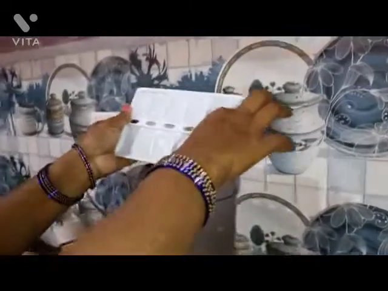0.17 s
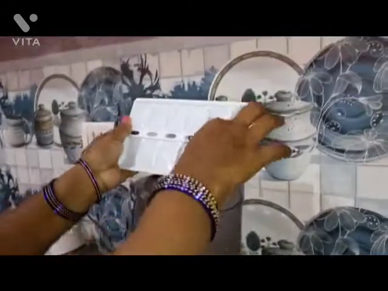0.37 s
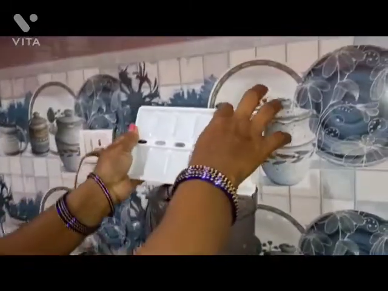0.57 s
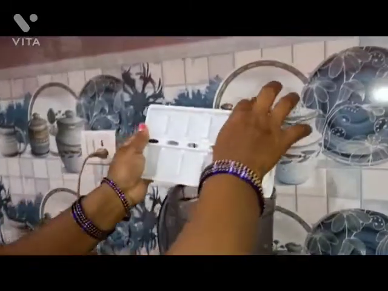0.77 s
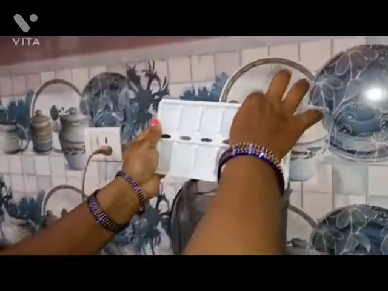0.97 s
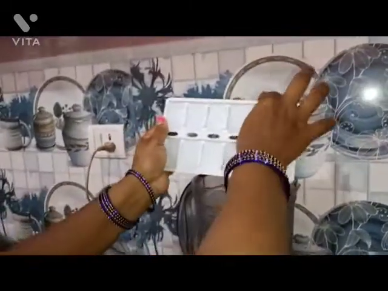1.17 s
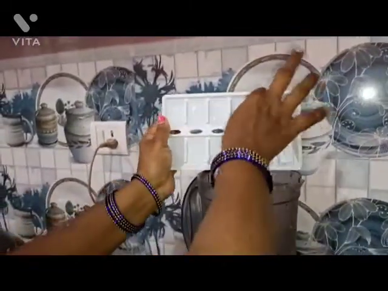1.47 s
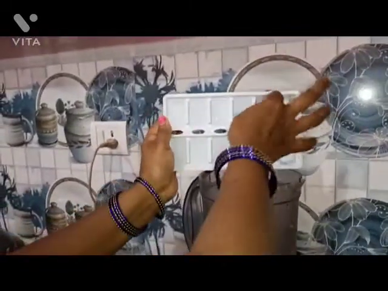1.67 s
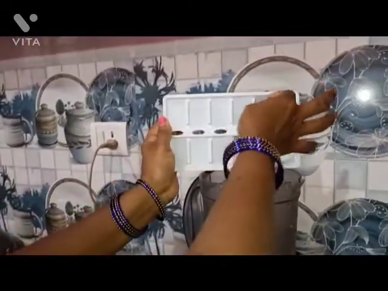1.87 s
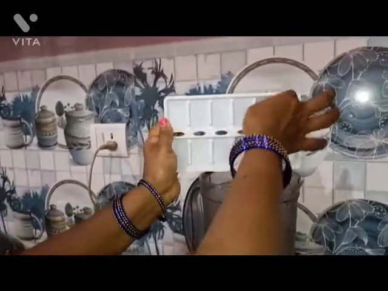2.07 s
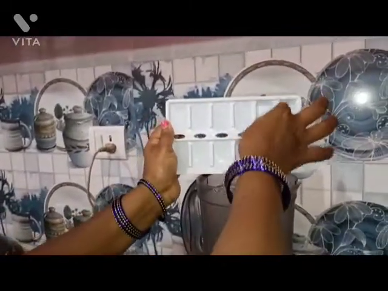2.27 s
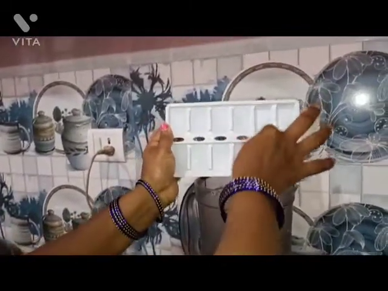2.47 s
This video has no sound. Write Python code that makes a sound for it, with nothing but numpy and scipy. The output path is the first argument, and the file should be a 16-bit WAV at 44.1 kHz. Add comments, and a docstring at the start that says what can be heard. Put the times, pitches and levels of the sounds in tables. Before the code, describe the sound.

Ice cubes crack from a plastic tray at 0.2 s with a bright double snap, then clatter densely into an empty plastic jar from 0.29 to 0.39, with stray knocks at 0.47 and 0.54. A tiny tick comes at 0.83, faint finger rubs from 0.98 to 1.8. More cubes clack at 2.07, 2.2 and 2.3, ringing glassier on ice. Close, lively tiled kitchen, quiet air and faint hum.

```python
"""In a tiled kitchen, a plastic ice tray is twisted over a plastic blender jar.
The ice cracks loose, cubes clatter into the jar, fingers shift on the tray, and a few more cubes drop.
Contacts are filtered noise bursts and rubs are grainy noise; cracks and knocks excite decaying jar modes.
The room answers with sparse echoes and a noise tail, over soft low swells, steady air noise and a faint hum."""
import sys
import numpy as np
from scipy import signal
from scipy.fft import rfft, irfft
from scipy.io import wavfile
from scipy.ndimage import uniform_filter1d

SR = 44100
rng = np.random.default_rng(int(sys.argv[2]) if len(sys.argv) > 2 else 0)


def persist_wave(psi):
    """Save psi, clipped to +-1, as 16-bit WAV."""
    counts = np.round(np.clip(psi, -1, 1) * 32767).astype(np.int16)
    wavfile.write(sys.argv[1], SR, np.atleast_2d(counts).T)


N = 114660

# Steady room noise, spectral shape before scaling: (frequency [Hz], relative level [dB])
AIR_SPECTRUM = [(25, 0.5), (49, -15), (123, -7.5), (153, -13), (249, -6.5), (394, -10), (503, -7.5),
                (560, -12.5), (988, -14.5), (2610, -19), (3920, -20.5), (7510, -39), (10700, -32),
                (16000, -44)]
AIR_DB = -52.5  # rms level
# Correlation of the room noise between left and right: (frequency [Hz], correlation [0-1])
AIR_CORRELATION = [(30, 0.68), (250, 1), (700, 0.53), (2000, 0.028), (12000, 0.81)]
# Household hum, narrow bands of noise: (frequency [Hz], rms level [dB], width at half amplitude [Hz])
HUM_BANDS = [(81.7, -65, 10), (254.5, -64, 5.3)]

# Decay of the room tail: (frequency [Hz], t60 [s])
TAIL_DECAY = [(200, 1.2), (1000, 0.57), (3500, 0.8036), (6000, 0.5827), (15000, 0.65)]
# Spectral shape of the room tail: (frequency [Hz], relative level [dB])
TAIL_SPECTRUM = [(200, -3), (1000, -8), (2000, 2.5), (3500, -1.5), (6000, 3), (10000, -4.5), (15000, -11)]
TAIL_DB, EARLY_DB = -3, -3.5
EARLY_T60_S, FIRST_ECHO_S = 0.14, 0.0025
ECHOES_PER_S = 2500

# Soft low pushes of jar and tray: (time [s], frequency [Hz], envelope peak [dB], time to peak [s])
LOW_PUSHES = [(0.351, 67, -44, 0.006), (2.27, 32.6, -54, 0.034), (0.27, 255, -44.5, 0.029)]

# Fingers and ice rubbing on the flexing tray:
# (time [s], fade to 1/e [s], level before the fade [dB], band centre [Hz])
TRAY_RUBS = [(0.0, 0.53, -61, 9000), (0.17, 0.03, -49.5, 6700), (0.979, 0.0049, -48.5, 5600),
             (1.307, 0.1, -61.5, 3300), (1.46, 0.016, -55.5, 3900), (1.641, 0.056, -51, 5600),
             (1.654, 0.14, -58.5, 2050)]
RUB_GRAIN_DB, RUB_RISE_S = 1.5, 0.0033

# Modes of jar and tray:
# (frequency [Hz], gain with jar empty [dB], gain with ice in it [dB], t60 [s]), all raised by JAR_DB
JAR_MODES = [(261, -12, 16.5, 0.34), (486.4, 7.5, -5, 0.089), (1118, 1, -5, 0.059), (1199, -10, 5, 0.24),
             (1930, -8, -1.5, 0.24), (2600, -9, -12, 0.25), (2900, -5, -16, 0.19), (3072, -10.5, 6, 0.27),
             (3065, -6, 7.5, 0.36), (3700, -16.5, -12, 0.15)]
JAR_DB, LOADED_S = 1, 1.5  # from LOADED_S on, the gains with ice apply

# Ice cracking loose in the tray:
# (time [s], level before CRACK_DB [dB], crumble decay to 1/e [s], treble shelf [dB])
ICE_CRACKS = [(0.202, -1, 0.0077, 0), (0.211, -6.5, 0.0028, -2), (0.2158, -20, 0.018, 28.5)]
# Spectral shape of the cracks: (frequency [Hz], relative level [dB])
CRACK_SPECTRUM = [(100, -26), (300, -4.5), (480, -8.5), (720, -16.5), (1100, -6), (2000, 3), (4000, 3),
                  (6300, 4.5), (7600, 1.5), (9500, 5.5), (15000, -7)]
CRACK_DB = 6.5

# Contacts of cubes knocking on tray and jar:
# (time [s], level before KNOCK_DB [dB], chatter decay to 1/e [s], clack pitch [Hz], second pitch [Hz],
#  clack boost [dB], hollow low part [dB], bright tick [dB], drive to jar and room [dB])
CUBE_KNOCKS = [(0.2921, -7, 0.003, 2920, 1650, 17, -18, 12, 5),
               (0.2938, 3, 0.002, 3150, 1830, 5, 0, -7, -2.5),
               (0.3058, -10.5, 0.0016, 3500, 2900, 6, -2, 8, -5),
               (0.3137, 2, 0.004, 3440, 5750, 10.5, -25, 6.5, -2),
               (0.3221, -8, 0.005, 3200, 4300, 11, 0, 16.5, 5.5),
               (0.3344, -5, 0.0024, 5300, 4000, 11.5, -26, 7, 8.5),
               (0.3395, -9.5, 0.003, 3810, 4640, 13, -9, 9.5, 9.5),
               (0.3505, -4.5, 0.0026, 6000, 3260, 3, -9.5, 11.5, 6),
               (0.3607, -2, 0.0041, 3110, 3670, 8, -0.5, 9, 3),
               (0.378, -11.5, 0.0016, 3140, 1970, 10, 1, 12, 3),
               (0.3831, 5, 0.0037, 3900, 5350, 5.5, -10, 3, -11.5),
               (0.3883, -9, 0.0032, 3700, 2800, 8, 2.5, 8.5, 5.5),
               (0.4707, -9.5, 0.005, 3130, 1997, 13.5, 4, 6.5, 0.5),
               (0.544, -12.5, 0.0037, 1234, 4700, 9.5, 6.5, 0, 1.5),
               (0.8274, -21, 0.0022, 3900, 1830, 12.5, -10, 11, -4),
               (0.8279, -23.5, 0.0011, 3440, 3780, 11, -4, -4, -9.5),
               (2.0176, -26, 0.0077, 3700, 2600, 4.5, -29, 1, 9.5),
               (2.0664, -8, 0.0006, 3390, 1740, 11, 1, -15, -4.5),
               (2.071, -4, 0.00078, 3500, 4100, 6.5, -4.5, -6, -5.5),
               (2.082, -12.5, .01, 3460, 1810, -11, -8, 5, 4.5),
               (2.1944, -4, 0.0024, 2840, 1240, 9.5, 1.5, 9, 0),
               (2.2262, -9, 0.0022, 1890, 5270, 7, -1, 2.5, 9.5),
               (2.228, -4.5, 0.0024, 3050, 2300, 14.5, 0.5, -1, -3.5),
               (2.3025, -7.5, 0.002, 3120, 1400, 24, -8, 4, -20),
               (2.3041, -4, 0.0019, 2325, 1860, 6.5, -3.5, -6.5, 5)]
# Spectral shape of the knocks: (frequency [Hz], relative level [dB])
KNOCK_SPECTRUM = [(100, -20), (300, -24.5), (500, -14.5), (750, -20.5), (1100, 0), (1500, -3.5), (2100, 1),
                  (3800, 2), (4600, -8), (6000, -6.5), (7400, -14), (8600, -9), (11500, -6.5),
                  (15000, -23.5)]
KNOCK_DB = 8.5
HOLLOW_HZ, TICK_HZ = 1760, 7450  # corners of the low and high parts
CLACK_OCT, SECOND_OCT = 0.077, 0.13  # half-widths of the two pitches [octaves]
TOUCH_S, CONTACT_RISE_S = 0.00061, 0.00088
RIGHT_OWN = 0.92  # weight of the right side's own chatter

# Response at the left microphone: (frequency [Hz], gain [dB])
LEFT_RESPONSE = [(300, -0.5), (1100, 4), (2400, 4.5), (4200, 7), (6200, 5.5), (8000, -3), (11000, -3.5),
                 (15000, 3)]
# Response at the right microphone: (frequency [Hz], gain [dB])
RIGHT_RESPONSE = [(300, 4.5), (1100, 6.5), (2400, -3), (4200, -4), (6200, -1), (8000, 3), (11000, -3.5),
                  (15000, -9.5)]
CEILING, EDGE_HZ = 0.85, 15700  # soft limit of the mix (amplitude) and upper band edge


def amp(db):
    """Logarithmic level: decibels become an amplitude gain."""
    return 10 ** (np.asarray(db) / 20)


def evened(x):
    """Mean power: a signal is scaled to rms 1."""
    return x / np.sqrt(np.mean(x ** 2) + 1e-20)


def read(points, hz):
    """Logarithmic pitch scale: a table is interpolated along log frequency."""
    f, value = np.transpose(points)
    return np.interp(np.log(hz + 1), np.log(f + 1), value)


def add(mix, s, sound):
    """Superposition: a sound is summed into the mix from time s."""
    part = mix[..., round(s * SR):][..., :sound.shape[-1]]
    part += sound[..., :part.shape[-1]]


def bins(size=2048):
    """Discrete spectrum: the frequencies on which filters are drawn, offset by 1 Hz to avoid zero."""
    return np.fft.rfftfreq(size, 1 / SR) + 1


def colour(x, db):
    """Minimum phase: folding the cepstrum makes a causal filter with the given gain on bins()."""
    cepstrum = irfft(db * np.log(10) / 20)
    half = len(cepstrum) // 2
    cepstrum[1:half] *= 2
    cepstrum[half + 1:] = 0
    response = irfft(np.exp(rfft(cepstrum)))
    return signal.oaconvolve(x, response[None], axes=1)[:, :x.shape[1]]


def background():
    """Stationary noise: partly correlated air noise, and narrow bands whose beating makes the hum waver."""
    hz = np.fft.rfftfreq(N, 1 / SR)
    shared, own, hum_noise = rfft(rng.standard_normal((3, N)))
    same = read(AIR_CORRELATION, hz)
    right = same * shared + np.sqrt(1 - same ** 2) * own
    air = evened(irfft(np.array([shared, right]) * amp(read(AIR_SPECTRUM, hz)), N))
    hum = np.zeros(N)
    for f, db, width in HUM_BANDS:
        resonance = 1 / (1 + (2 * (hz - f) / width) ** 2)
        hum += amp(db) * evened(irfft(hum_noise * resonance, N))
    return amp(AIR_DB) * air + hum


def kitchen(x):
    """Reverberation: sparse echoes from jar, counter and tiles join a tail decaying at its own rate per band."""
    t = np.arange(SR) / SR
    onset = np.clip(t / FIRST_ECHO_S - 1, 0, 1)
    sparse = rng.standard_normal((2, SR)) * (rng.random((2, SR)) < ECHOES_PER_S / SR)
    early = sparse * onset * amp(-60 * t / EARLY_T60_S)
    early /= np.linalg.norm(early, axis=1, keepdims=True)
    hz, when, z = signal.stft(rng.standard_normal((2, SR)), SR, nperseg=256)
    t60 = read(TAIL_DECAY, hz)[:, None]
    z = z * amp(read(TAIL_SPECTRUM, hz)[:, None] - 60 * when / t60)
    tail = signal.istft(z, SR, nperseg=256)[1][:, :SR] * onset * np.sqrt(20 / SR)
    echoes = amp(EARLY_DB) * early + amp(TAIL_DB) * tail
    return signal.fftconvolve(x, echoes, axes=1)[:, :N]


def thump():
    """Damped oscillation: low tones swell and die as the tray flexes and the load lands."""
    t, out = np.arange(SR // 3) / SR, np.zeros((2, N))
    for s, hz, db, swell_s in LOW_PUSHES:
        u = t / swell_s
        swell = u * np.exp(1 - u)
        add(out, s, amp(db) * swell * np.sin(2 * np.pi * hz * t))
    return out


def rubs():
    """Friction noise: grains of uneven strength in one band start quickly and fade."""
    out, hz, t = np.zeros((2, N)), bins(), np.arange(SR // 2) / SR
    for s, length, db, pitch_hz in TRAY_RUBS:
        grains = rng.standard_normal((2, len(t))) * amp(RUB_GRAIN_DB * rng.standard_normal(len(t)))
        band_db = -28 * np.tanh(np.log2(hz / pitch_hz) ** 2 / 3)
        scrape = evened(colour(grains, band_db))
        envelope = np.minimum(t / RUB_RISE_S, 1) * np.exp(-(t / length) ** 2)
        add(out, s, amp(db) * scrape * envelope)
    return out


def jar(x):
    """Modal resonance: each contact leaves modes ringing; once ice lies in the jar, other modes stand out."""
    t, loaded = np.arange(SR // 2) / SR, np.arange(N) > LOADED_S * SR
    out = np.zeros((2, N))
    for hz, empty_db, loaded_db, t60 in JAR_MODES:
        rate = np.log(1000) / t60
        mode = 2 * rate / SR * np.exp(-rate * t) * np.cos(2 * np.pi * hz * t)
        drive = x * np.where(loaded, amp(loaded_db), amp(empty_db))
        out += signal.oaconvolve(drive, mode[None], axes=1)[:, :N]
    return amp(JAR_DB) * out


def contact(chatter_s, size=4096):
    """Impulsive contact: a sharp touch and dying chatter, spectrally flattened, partly shared by the sides."""
    t = np.arange(size) / SR
    envelope = np.exp(-t / chatter_s) * (1 - np.exp(-t / CONTACT_RISE_S))
    chatter = rng.standard_normal((2, size)) * envelope
    chatter /= np.linalg.norm(chatter, axis=1, keepdims=True)
    chatter[0, 0] += TOUCH_S / chatter_s
    chatter[1] = np.sqrt(1 - RIGHT_OWN ** 2) * chatter[0] + RIGHT_OWN * chatter[1]
    z = rfft(chatter)
    z /= np.sqrt(uniform_filter1d(abs(z) ** 2, size=61, axis=1))
    return irfft(z) * (t < t[-1] / 2)


def cracks():
    """Brittle fracture: broad, bright snaps as the ice lets go of the tray."""
    out, hz = np.zeros((2, N)), bins()
    for s, db, crumble_s, treble_db in ICE_CRACKS:
        shelf = treble_db * hz / (hz + TICK_HZ)
        tone = CRACK_DB + db + read(CRACK_SPECTRUM, hz) + shelf
        add(out, s, colour(contact(crumble_s), tone))
    return out


def knocks():
    """Impact: each contact of a cube is coloured around two pitches; gives direct sound, room and jar drive."""
    (direct, ring, blows), hz = np.zeros((3, 2, N)), bins()
    low, high = 1 / (1 + (hz / HOLLOW_HZ) ** 4), 1 / (1 + (TICK_HZ / hz) ** 4)
    for s, db, chatter_s, clack_hz, second_hz, clack_db, hollow_db, tick_db, ring_db in CUBE_KNOCKS:
        first = 1 / (1 + (np.log2(hz / clack_hz) / CLACK_OCT) ** 2)
        second = 1 / (1 + (np.log2(hz / second_hz) / SECOND_OCT) ** 2)
        tone = KNOCK_DB + db + read(KNOCK_SPECTRUM, hz)
        tone += clack_db * (first + second) + hollow_db * low + tick_db * high
        knock = colour(contact(chatter_s), tone)
        add(direct, s, knock)
        add(ring, s, knock * amp(ring_db))
        impulse = np.eye(1, len(hz))
        add(blows, s, colour(impulse, tone + ring_db))
    return direct, ring, blows


def scene():
    """Superposition of paths: direct sound, jar and room reach two microphones of unlike response."""
    direct, ring, blows = knocks()
    snaps, hz = cracks(), bins()
    body = snaps + rubs() + jar(snaps + blows)
    wet = direct + body + kitchen(ring + body)
    left = colour(wet[:1], read(LEFT_RESPONSE, hz))
    right = colour(wet[1:], read(RIGHT_RESPONSE, hz))
    return np.vstack([left, right]) + thump() + background()


def record(dry):
    """Soft limiting: the highest peaks of the mix are rounded off, and the top treble is cut."""
    rounded = dry / (1 + (dry / CEILING) ** 6) ** (1 / 6)
    lowpass = signal.firwin(255, EDGE_HZ, window=("kaiser", 9), fs=SR)
    return signal.oaconvolve(rounded, lowpass[None], "same")


dry = scene()
out = record(dry)
persist_wave(out)
```